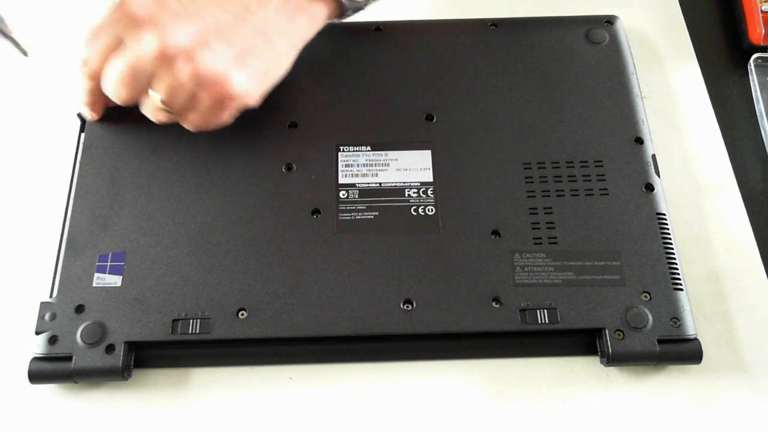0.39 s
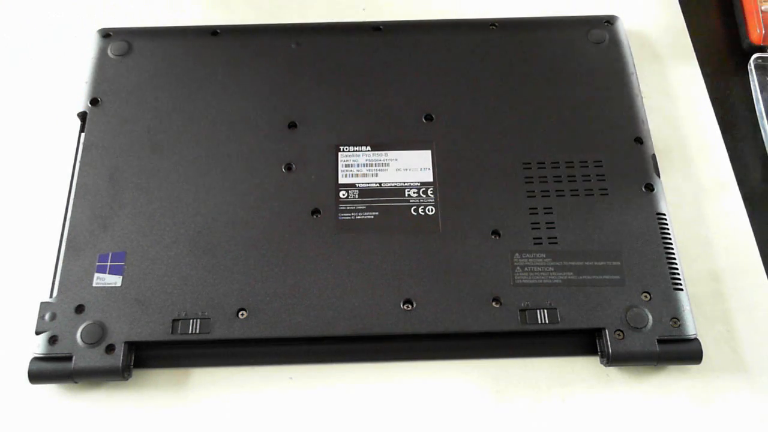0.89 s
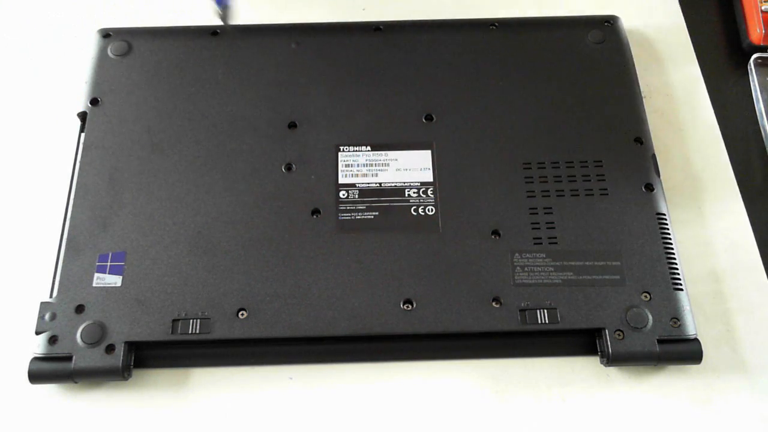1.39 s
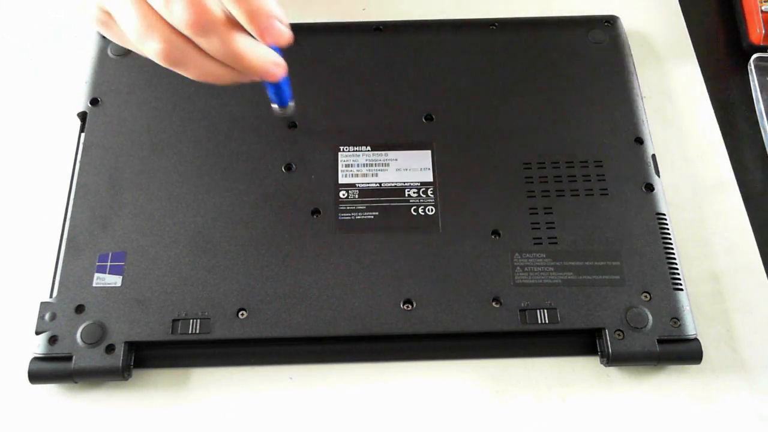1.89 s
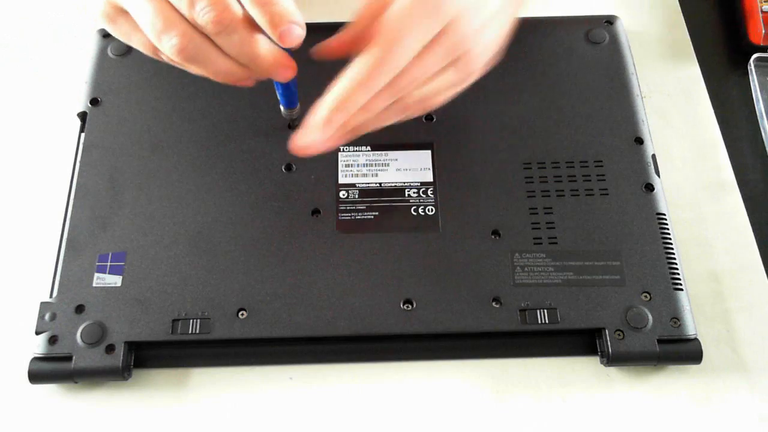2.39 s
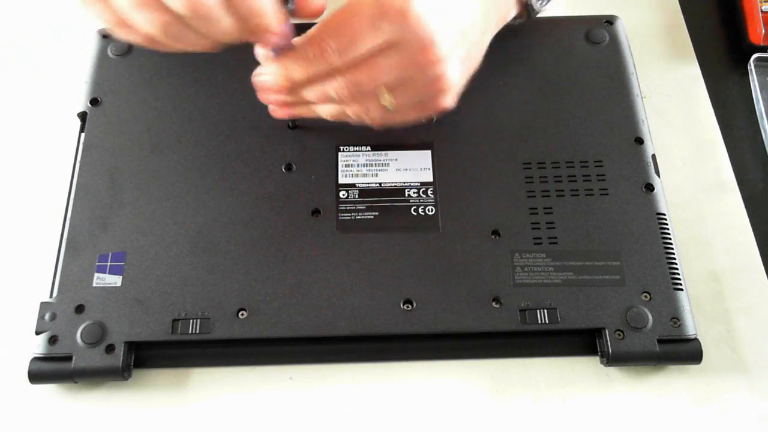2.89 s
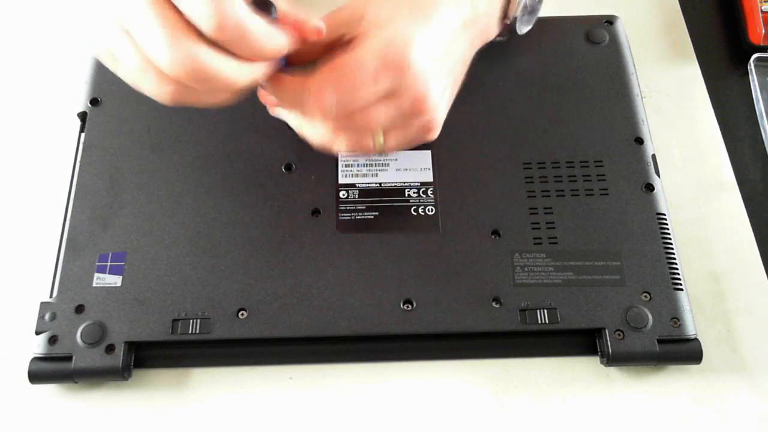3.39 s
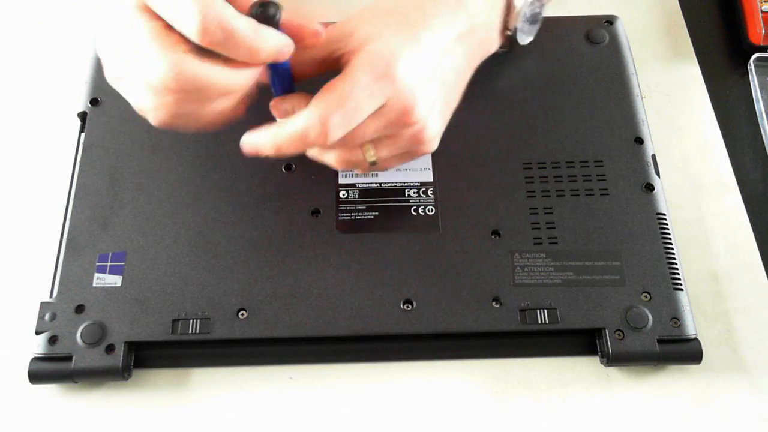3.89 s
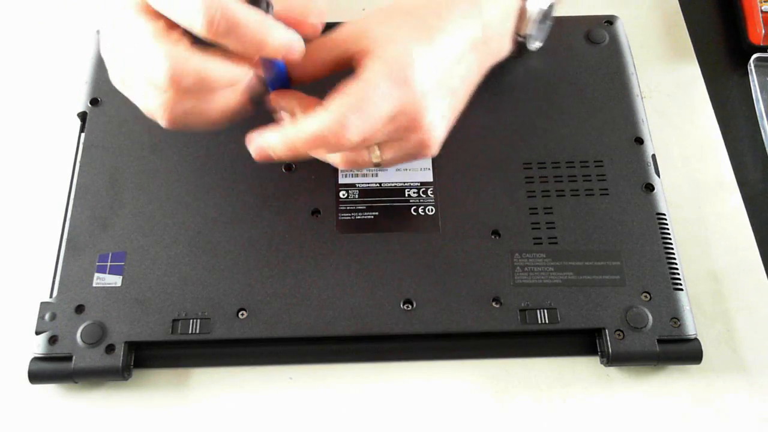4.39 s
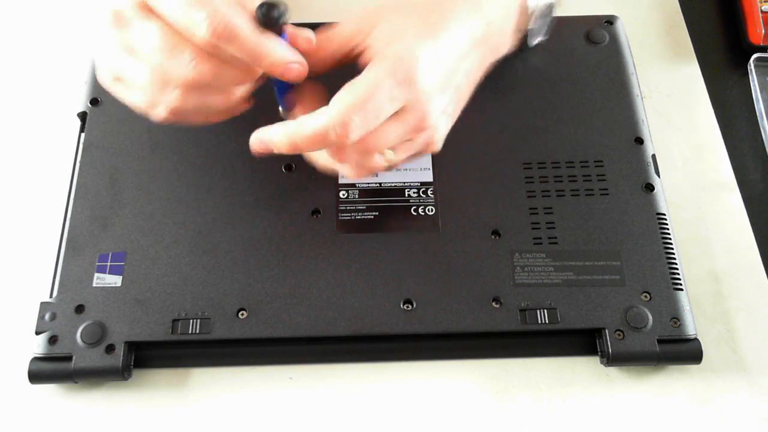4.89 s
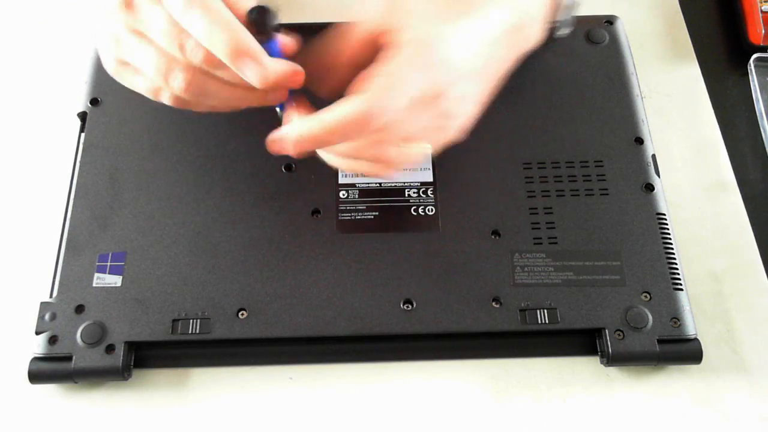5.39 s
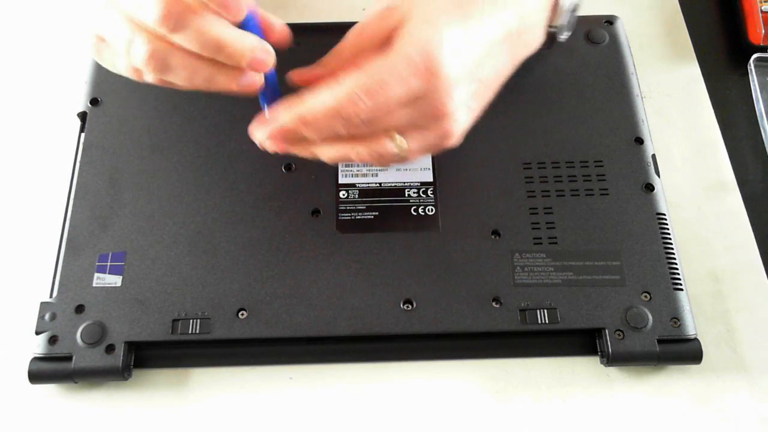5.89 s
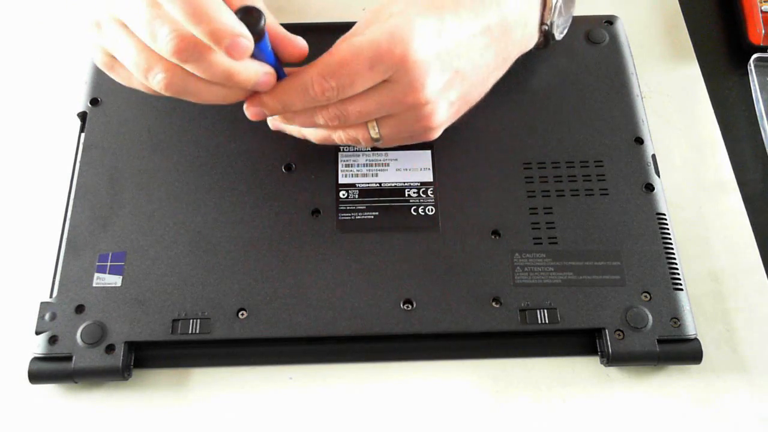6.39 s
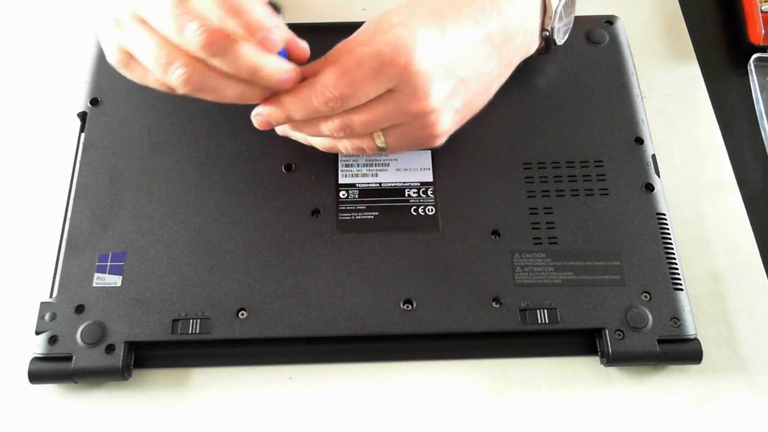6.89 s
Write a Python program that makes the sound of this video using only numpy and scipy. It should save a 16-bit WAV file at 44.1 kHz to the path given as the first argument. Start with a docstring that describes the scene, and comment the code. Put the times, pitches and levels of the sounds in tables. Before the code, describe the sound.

A harsh bright burst of screws dropping into a thin tray, followed by irregular small taps and dull knocks of a screwdriver on hollow plastic.

```python
"""A small room with a bench, where a screwdriver works small screws out of a plastic laptop case.
Noise snaps and damped panel modes make the clicks and knocks; the steel shaft rings faintly once.
Screws clatter into a tray: bright snaps and rattling grains excite its many short modes.
The bench thumps, hands rub, cloth swishes and the microphone stand sways; shaped noise is the air."""
import sys
import numpy as np
from scipy import signal
from scipy.io import wavfile

SR = 44100
rng = np.random.default_rng(int(sys.argv[2]) if len(sys.argv) > 2 else 0)


def materialize(psi):
    """Save the field psi as 16-bit PCM at rate SR to the path in sys.argv[1].

    A 1-D psi becomes a single channel; in a 2-D psi each row is a channel.
    """
    bounded = np.clip(np.atleast_2d(psi).T, -1, 1)
    quanta = np.round(bounded * 32767).astype(np.int16)
    wavfile.write(sys.argv[1], SR, quanta)


def voltage_ratio(decibels):
    """Convert decibels (scalar or array-like) to amplitude ratios, 20 dB per decade."""
    exponent = np.asarray(decibels, float) / 20
    return 10 ** exponent


N = 309582

# Tip and screw against the case:
# [t/s, mid crack peak level/dB, top crack rms level/dB, case drive level/dB, bench drive level/dB]
TAP_BLOWS = [(1.4691, -40, -67, -41, -60), (2.0319, -33, -57, -23, -36.5), (2.0924, -21.5, -31, -19, -28.5),
             (2.28, -37, -72, -43, -55), (2.4223, -35.5, -61, -52, -52), (2.4977, -18, -27, -13.5, -25.5),
             (2.6496, -18, -32.5, -11.5, -21), (2.806, -35.5, -67, -38.5, -39),
             (2.9062, -19, -33.5, -33.5, -50), (3.3238, -31, -64, -37, -38.5),
             (3.3878, -26, -64, -41.5, -42), (3.4913, -20, -35.5, -33.5, -36.5),
             (3.9342, -30.5, -70, -29, -45), (4.0722, -37, -63, -40.5, -49), (4.1111, -36.5, -67, -35, -40),
             (4.2988, -38, -63, -32, -43), (4.313, -27.5, -56, -24, -50),
             (4.3379, -18.5, -35.5, -14, -24.5), (4.364, -23, -53, -46, -49),
             (4.536, -30.5, -62, -37, -36.5), (4.6617, -38, -65, -34.5, -39), (4.676, -33.5, -67, -34, -44),
             (4.7173, -19, -40, -16, -26.5), (4.8174, -31.5, -70, -29.5, -44), (4.854, -29, -69, -27, -38),
             (4.891, -33, -67.5, -32, -55), (5.001, -38, -67, -33, -52), (5.037, -34, -69, -37, -60),
             (5.202, -23.5, -43, -23, -30.5), (5.353, -27, -67, -42, -40), (5.3825, -31.5, -71, -35, -59),
             (5.472, -27.5, -64, -27.5, -55), (5.527, -26.5, -35.5, -27.5, -34.5),
             (5.5514, -29.5, -37.5, -39, -50), (6.5261, -25.5, -65, -15, -40.5),
             (6.5993, -26.5, -32, -28.5, -31), (6.661, -28.5, -42.5, -25.5, -35),
             (6.7621, -27, -47, -20.5, -26), (6.770, -16.5, -30, -23, -48), (6.7877, -33, -51, -20.5, -46),
             (6.799, -27, -50, -27, -51), (7.008, -18, -46, -15.5, -18.5)]
# The tip drags in the screw hole: [start t/s, loudest t/s, end t/s, relative level/dB]
TIP_SCUFFS = [(3.9, 4.2, 4.2, -31.5), (4.3, 4.6, 4.2, -30), (4.75, 4.87, 4.8, -34),
              (6.5, 6.562, 6.63, -15.5), (6.73, 6.78, 6.87, -19)]
# One blow catches the free shaft: [t/s, drive level/dB]
SHAFT_BLOW = (2.499, -34)
# A loose screw rings under the tip: [t/s, drive level/dB]
SCREW_BLOWS = [(3.324, -39), (3.389, -41), (3.492, -27.5), (5.035, -47), (5.356, -40), (5.384, -53)]
# While the driver turns, faint ticks fall at random: [start t/s, end t/s]
TURNING_SPANS = [(2.15, 3.0), (3.2, 5.6), (6.5, 6.9)]
# Loose screws bouncing in a tray: [t/s, mid peak level/dB, top rms level/dB, tray drive level/dB]
TRAY_BOUNCES = [(0.001, -20.5, -33.5, -50), (0.018, -27, -36.5, -61), (0.36, -21, -45, -52),
                (0.377, -23, -40, -54), (0.395, -27, -47, -55), (1.618, -4.5, -9.5, -11),
                (1.6373, 2.5, -7, -18.5), (1.649, -2.5, -14.5, -19.5), (1.657, -4.5, -9, -10),
                (1.682, -4, -20, -20.5), (1.702, -18, -27, -47), (1.749, -8, -14, -44),
                (1.764, -20, -27, -31)]
# The screws keep rattling after they land: [start t/s, loudest t/s, end t/s, relative level/dB]
TRAY_RATTLES = [(.355, .385, 0.46, -36), (1.618, 1.652, 1.76, -7.5), (1.749, 1.757, 1.9, -27.5)]
# A short deep one-sided pulse amid the loudest clatter: [t/s, peak level/dB, length t/s]
DEEP_PULSE = (1.646, -16, 0.0046)
# A hand leans on the bench and the microphone stand sways: [t/s, drive level/dB]
HAND_LEANS = [(2.1, -46), (2.66, -40), (3.24, -38.5), (3.47, -37.5), (3.75, -39.5), (3.98, -36.5),
              (4.5, -39), (4.7, -36), (4.9, -38.5), (5.19, -35), (5.52, -37.5), (6.52, -37.5), (6.77, -47)]
# Skin rubbing on the case, mean course: [t/s, level/dB]
SKIN_RUB = [(2.0, -60.5), (2.7, -52.5), (3.0, -63.5), (3.9, -60), (4.25, -51.5), (4.6, -56.5), (4.9, -54.5),
            (5.4, -72), (5.7, -71), (6.5, -64.5), (6.7, -59), (7.02, -71)]
# Cloth brushing past: [centre t/s, 1/e half-length t/s, peak level/dB, low edge f/Hz, high edge f/Hz]
CLOTH_SWISHES = [(0.28, 0.069, -57, 3000, 7000), (.585, 0.025, -56, 11100, 15800),
                 (.78, 0.037, -56, 8000, 16000), (1.1, 0.16, -59.5, 9900, 12000)]
# Resonant modes of each body: [f/Hz, relative level/dB, 60 dB decay t/s]
CASE_MODES = [(413, -12, 0.1), (547, -5, 0.0062), (630, -8.5, 0.14), (710, 8, 0.011), (758, -10.5, 0.035),
              (920, -12.5, 0.032), (1095, -5, .025), (1202, -6, 0.044), (1447, -10.5, 0.014),
              (1588, -13.5, 0.051), (1816, -12, 0.049), (2046, -15, 0.021)]
SHAFT_MODES = [(7650, -4, .12), (7741, -2, .16), (7850, -4, .1), (10250, -9, .1), (10410, -8, .12),
               (10600, -9, .1), (12050, -2, .08), (12160, 0, .1), (12330, -2, .08)]
SCREW_MODES = [(3500, -2, .012), (5800, -1, .014), (7500, 0, .014)]
TRAY_MODES = [(750, -11, .02), (980, -7, .04), (1250, -12, .02), (1550, -14, .02), (1900, -20, .04),
              (2326, -14, .06), (3000, -7, .03), (3289, -2, .07), (3570, -8, .05), (3903, -8, .05),
              (3999, -4, .06), (4958, -12, .05), (5841, -13, .05), (6500, -12, .04), (6800, -13, .04),
              (8010, -10, .04), (8400, -10, .04), (9500, -14, .03), (10830, -13, .04), (11750, -11, .06)]
BENCH_MODES = [(60.4, -24, .06), (99.3, -1.5, 0.248), (110.1, 1.5, 0.24), (169, -31, 0.035),
               (248, -0.5, .05)]
STAND_MODES = [(27.6, 1.5, 0.69), (45, -1, .3)]
# Spectral density of the air noise: [f/Hz, relative level/dB per Hz]
AIR_SPECTRUM = [(30, -5), (50, 7), (80, 2), (120, 4), (230, -2.5), (310, -6), (450, -3), (630, -9.5),
                (1050, -5.5), (1500, -13.5), (2500, -18), (4000, -24), (6500, -29.5), (10000, -29.5),
                (16000, -33)]
# Reverberation of the room: [f/Hz, 60 dB decay t/s, relative level/dB]
ROOM_DECAY = [(200, 0.4, 0.5), (800, 0.15, -3), (2000, 0.27, -2.5), (5000, 0.26, 0), (12000, 0.21, -5.5)]

SPLIT_HZ = 6800  # boundary between middle and treble of a snap
CONTACT_S, CONTACT_S_PER_DB = .03, .0004  # a snap lasts longer the more the knock outweighs it
DULL_HZ_PER_DB = 235  # and it loses its upper middle
SNAP_RISE_S = .0025
SCUFF_CUT_HZ = 540  # a slow drag drives mostly the low modes
SCUFF_DB = RATTLE_DRIVE_DB = -41.5  # friction is a far weaker drive than a blow
TICKS_PER_S, TICK_DB, TICK_SPREAD_DB = 6, -43, 2.0
GRIT_S, RETOUCH_DB = .004, -8  # a contact is a few touches within this time, the later ones weaker
SPOT_DB = 2.5  # standard deviation of mode strengths from blow to blow
EDGE_DB = -30  # how far a swell lies down at its start and end
BENCH_LAG_S = 0.0054  # the heavy top answers late
AIR_DB, ROOM_DB = -41.5, -7.5


def taps():
    """Impact and resonance: a contact snaps, then case, shaft and screw ring at their own modes."""
    s, mid_db, top_db, knock_db, _ = np.transpose(TAP_BLOWS)
    tick_s, tick_db = ticks()
    s = np.append(s, tick_s)
    mid_db = np.append(mid_db, tick_db)
    top_db = np.append(top_db, tick_db - 22)
    knock_db = np.append(knock_db, tick_db - 2)

    excess_db = knock_db - mid_db
    edge_hz = np.clip(SPLIT_HZ - DULL_HZ_PER_DB * (excess_db + 3), 3000, SPLIT_HZ)
    snap_s = CONTACT_S + CONTACT_S_PER_DB * excess_db
    snap = cracks(s, mid_db, top_db, snap_s, low_hz=1287, high_hz=edge_hz, rise_s=SNAP_RISE_S)

    friction = rms_one(band(grains(600, spread_db=7.5), 176, SCUFF_CUT_HZ))
    scuff = voltage_ratio(SCUFF_DB) * friction * swells(TIP_SCUFFS)
    knock = strike(s, knock_db, CASE_MODES, rubbing=scuff, count=3)
    knock = band(knock, 200, 3500)  # a small panel radiates little bass
    shaft = strike(SHAFT_BLOW[:1], SHAFT_BLOW[1], SHAFT_MODES)
    screw = strike(*np.transpose(SCREW_BLOWS), SCREW_MODES, count=3)
    return snap + knock + shaft + screw


def ticks():
    """Random arrivals: faint contacts fall evenly by chance, their levels normally distributed."""
    s = np.concatenate([rng.uniform(start, end, round((end - start) * TICKS_PER_S))
                        for start, end in TURNING_SPANS])
    return s, TICK_DB + TICK_SPREAD_DB * rng.standard_normal(len(s))


def clatter():
    """Repeated impact: each bounce snaps and rings the thin tray; a fast rattle fills the gaps."""
    s, mid_db, top_db, ring_db = np.transpose(TRAY_BOUNCES)
    rattle = grains(1800, spread_db=3.5) * swells(TRAY_RATTLES)
    snap = cracks(s, mid_db, top_db, np.full(len(s), .03), low_hz=2550,
                  high_hz=np.full(len(s), SPLIT_HZ))
    tray = strike(s, ring_db, TRAY_MODES, rubbing=voltage_ratio(RATTLE_DRIVE_DB) * rattle)
    return snap + band(rattle, 2200, 15110) + tray


def thumps():
    """Structure-borne sound: the bench booms, reaching the microphone through its stand; a short deep one-sided
    pulse sounds amid the loudest clatter."""
    s, thump_db = np.transpose(TAP_BLOWS)[[0, 4]]
    late_s = np.minimum(s + BENCH_LAG_S, (N - 1) / SR)
    boom = strike(late_s, thump_db, BENCH_MODES, spot_db=4.0)
    at, db, length = DEEP_PULSE
    phase = np.clip((np.arange(N) / SR - at) / length, 0, 1)
    return boom + voltage_ratio(db) * np.sin(np.pi * phase) ** 2


def hands():
    """Friction and sway: skin rubs as fine-grained noise, leaning sways the stand, cloth swishes."""
    t = np.arange(N) / SR
    skin = rms_one(band(grains(6000, spread_db=2.0), 900, 4200))
    rub = skin * voltage_ratio(np.interp(t, *np.transpose(SKIN_RUB)) + 3.0 * drift(11))
    sway = band(strike(*np.transpose(HAND_LEANS), STAND_MODES, spot_db=1.0), 15, 60)
    white = rng.standard_normal(N)
    cloth = 0
    for at, length, db, low_hz, high_hz in CLOTH_SWISHES:
        swish = rms_one(band(white, low_hz, high_hz))
        cloth = cloth + voltage_ratio(db) * swish * np.exp(-((t - at) / length) ** 2)
    return rub + sway + cloth


def air():
    """Broadband noise: ventilation rumble and microphone hiss, each third-octave flickering a little."""
    out, edges = 0, 18 * 2 ** np.arange(0, 10.1, 1 / 3)
    white = rng.standard_normal((2, N + SR))  # neighbouring bands use different noise
    for k, (low, high) in enumerate(zip(edges, edges[1:])):
        gain = voltage_ratio(at_hz(AIR_SPECTRUM, np.sqrt(low * high)) + 1.0 * drift(11.0))
        out = out + gain * band(white[k % 2], low, high)[SR:]  # the filter settles for 1 s
    return voltage_ratio(AIR_DB) * rms_one(out)


def room(x):
    """Reverberation: after a short gap, diffuse reflections decay exponentially in each octave."""
    t, tail, edges = np.arange(SR // 2) / SR, 0, 70 * 2 ** np.arange(0, 9)
    decay = np.array(ROOM_DECAY)[:, [0, 1]]
    colour = np.array(ROOM_DECAY)[:, [0, 2]]
    for low, high in zip(edges, edges[1:]):
        hz = np.sqrt(low * high)
        envelope = voltage_ratio(at_hz(colour, hz) - 60 * t / at_hz(decay, hz))
        tail = tail + band(rng.standard_normal(len(t)), low, high) * envelope
    tail = tail * np.clip((t - .004) / .003, 0, 1)
    return signal.fftconvolve(x, tail / np.sqrt(np.sum(tail ** 2)))[:N]


def strike(times, db, modes, rubbing=0, spot_db=SPOT_DB, count=1):
    """Modal superposition: the place of a blow sets each mode's share; rubbing drives the same modes."""
    spots = spot_db * rng.standard_normal((len(times), len(modes)))
    later = np.arange(count) > 0
    late_s = GRIT_S * rng.random((len(times), count)) * later
    touches = np.minimum(np.array(times)[:, None] + late_s, (N - 1) / SR).ravel()
    out = 0
    for k, (hz, level_db, t60) in enumerate(modes):
        touch_db = (db + spots[:, k])[:, None] + RETOUCH_DB * later
        force = clicks_at(touches, touch_db.ravel()) + rubbing
        out = out + (-1) ** k * ring(voltage_ratio(level_db) * force, hz, t60)  # alternate polarity
    return out


def ring(force, hz, t60):
    """Damped resonance: a unit blow gives a decaying sine of initial height 1."""
    r, w = voltage_ratio(-60 / (t60 * SR)), 2 * np.pi * hz / SR
    return signal.lfilter([0, np.sin(w)], [1, -2 * r * np.cos(w), r * r], force)


def clicks_at(times, db):
    """Impulsive force: each blow is a single sample."""
    clicks = np.zeros(N) + 1e-18
    np.add.at(clicks, np.round(np.array(times) * SR).astype(int), voltage_ratio(np.array(db)))
    return clicks


def cracks(times, mid_db, top_db, t60s, low_hz, high_hz, rise_s=1e-4):
    """Contact noise: a snap is dying noise whose middle and treble have separate levels."""
    out, t = np.zeros(N + 4096), np.arange(4096) / SR
    noises = rng.standard_normal((len(times), 2, 4096))
    for s, mid, top, t60, edge_hz, noise in zip(times, mid_db, top_db, t60s, high_hz, noises):
        burst = noise * voltage_ratio(-60 * t / max(t60, .004)) * np.minimum(t / rise_s, 1)
        middle = band(burst[0], low_hz, edge_hz)
        treble = band(burst[1], SPLIT_HZ, 14100)
        snap = voltage_ratio(mid) * middle / np.max(np.abs(middle))
        snap = snap + voltage_ratio(top) * treble / np.std(treble[:SR // 100])  # rms of the first 10 ms
        start = round(s * SR)
        out[start:start + 4096] += snap
    return out[:N]


def grains(per_s, spread_db):
    """Granular friction: sparse random micro-contacts of uneven size and either sign; rms 1."""
    sizes = voltage_ratio(spread_db * np.minimum(rng.exponential(1, N), 4)) * rng.choice([-1, 1], N)
    return rms_one(sizes * (rng.random(N) < per_s / SR))


def swells(rows):
    """Envelope: for each row the gain rises to a peak and falls again, straight in dB."""
    t, gain = np.arange(N) / SR, 0
    for start, top, end, db in rows:
        shape_db = np.interp(t, [start, top, end], [EDGE_DB, 0, EDGE_DB], left=-200, right=-200)
        gain = gain + voltage_ratio(db + shape_db)
    return gain


def drift(rate):
    """Slow fluctuation: normal random points, rate of them per second, joined by lines."""
    points = rng.standard_normal(int(N / SR * 60) + 2)
    return np.interp(np.arange(N) / SR * rate, np.arange(len(points)), points)


def rms_one(x):
    """Normalisation: scale to unit rms."""
    return x / np.sqrt(np.mean(x ** 2) + 1e-20)


def at_hz(points, hz):
    """Interpolation: read a table on a log-frequency axis."""
    table = np.array(points)
    return np.interp(np.log(hz), np.log(table[:, 0]), table[:, 1])


def band(x, low_hz, high_hz):
    """Filtering: Butterworth band-pass."""
    edges = [low_hz, min(high_hz, .45 * SR)]
    return signal.sosfilt(signal.butter(2, edges, "band", fs=SR, output="sos"), x)


def scene():
    """Superposition: bench sounds with their reverberation, over thumps, hands and air."""
    bench = taps() + clatter()
    return (bench + voltage_ratio(ROOM_DB) * room(bench) + thumps() + hands() + air())[None, :]


def roll_off(x):
    """The treble ends steeply here."""
    return signal.sosfilt(signal.butter(12, 16600, fs=SR, output="sos"), x)


def record(dry):
    """Band limiting and overload: the top is cut steeply; the loudest clatter clips the input."""
    low_pass = signal.ellip(10, .5, 70, 15900, fs=SR, output="sos")  # ripple/dB, stop/dB, edge f/Hz
    cut = signal.sosfilt(low_pass, dry)
    return roll_off(np.clip(cut, -1, 1))


dry = scene()
out = record(dry)
materialize(out)
```